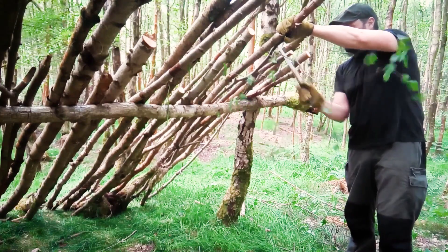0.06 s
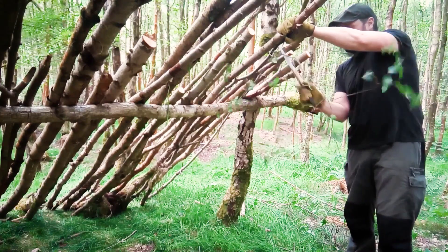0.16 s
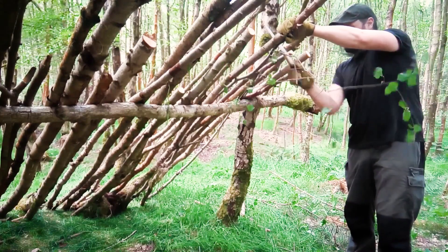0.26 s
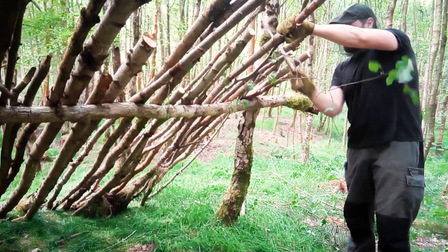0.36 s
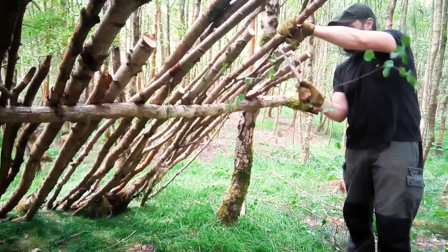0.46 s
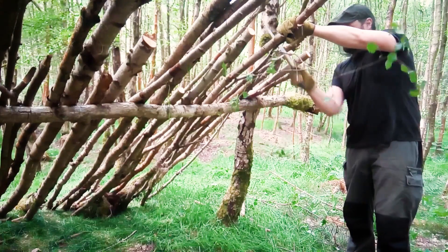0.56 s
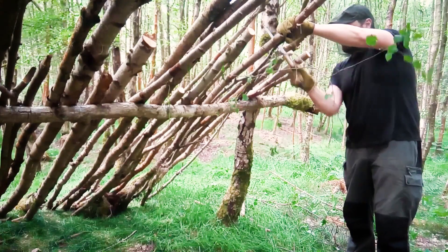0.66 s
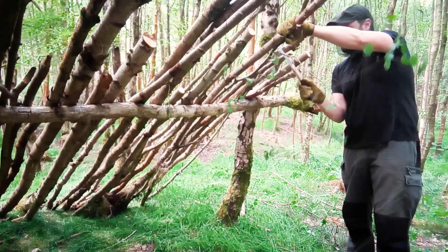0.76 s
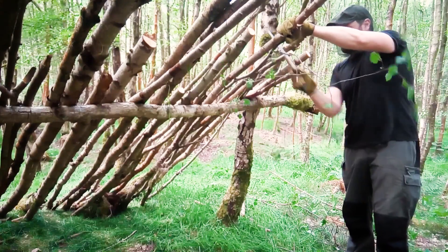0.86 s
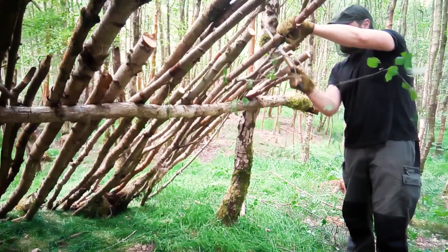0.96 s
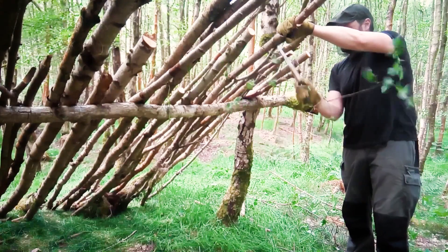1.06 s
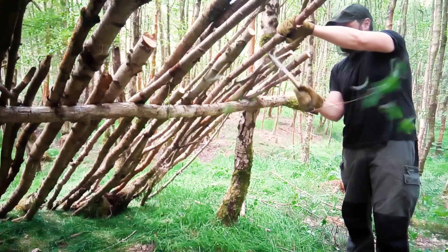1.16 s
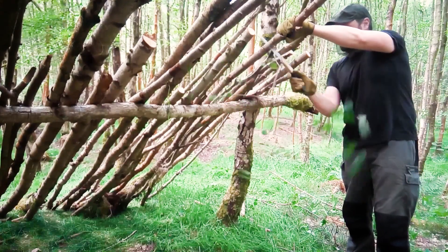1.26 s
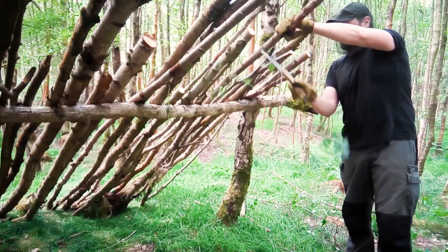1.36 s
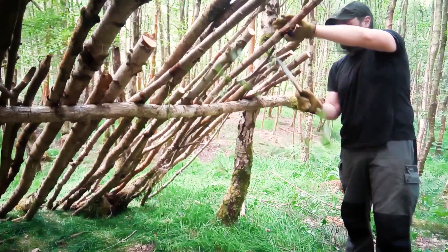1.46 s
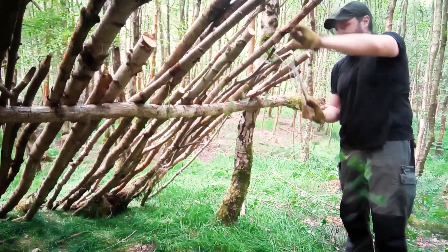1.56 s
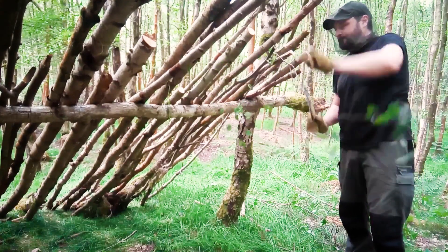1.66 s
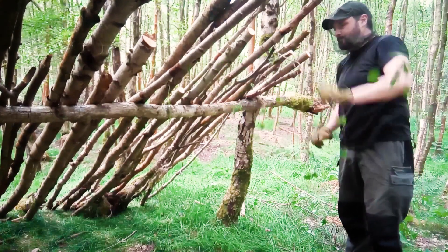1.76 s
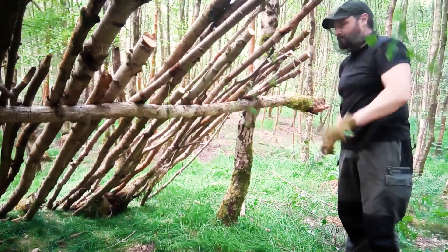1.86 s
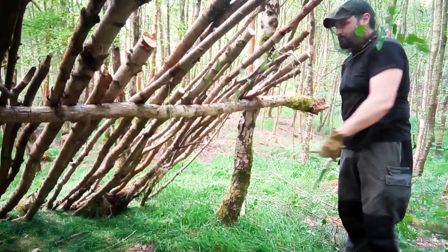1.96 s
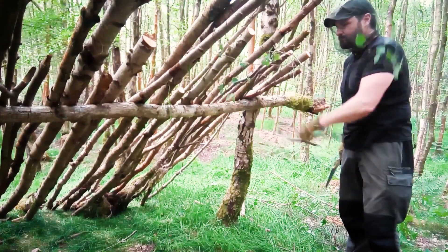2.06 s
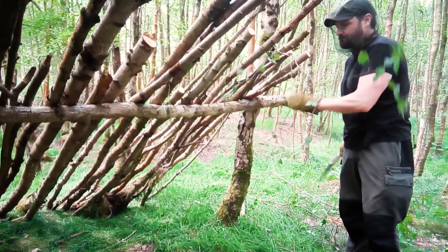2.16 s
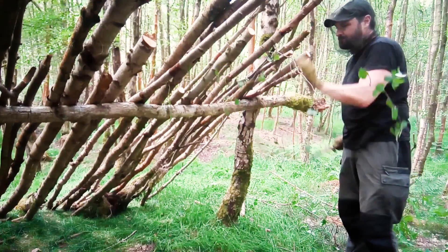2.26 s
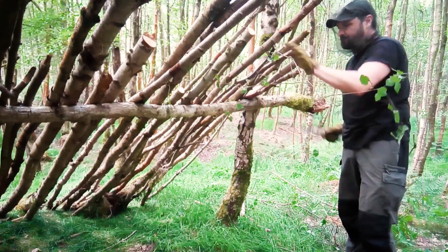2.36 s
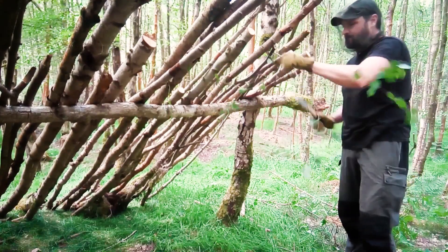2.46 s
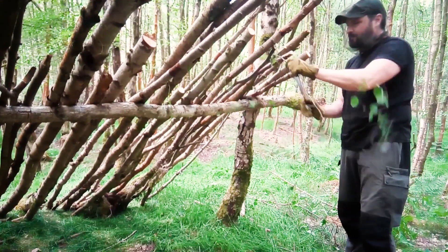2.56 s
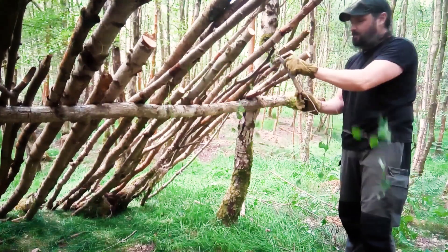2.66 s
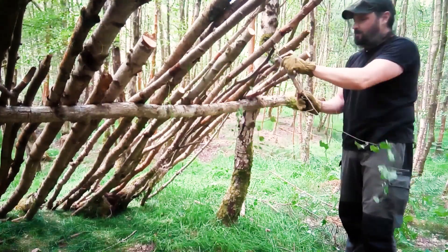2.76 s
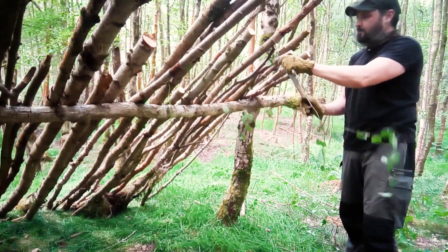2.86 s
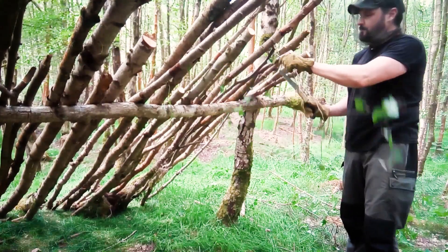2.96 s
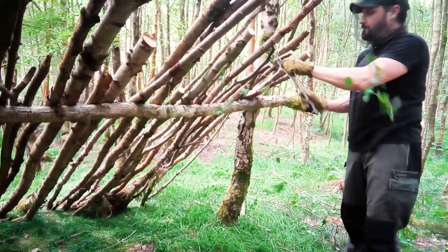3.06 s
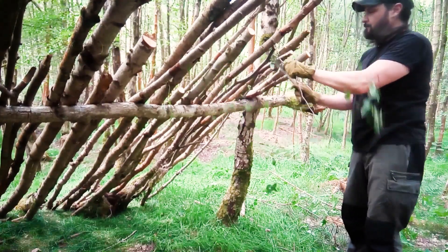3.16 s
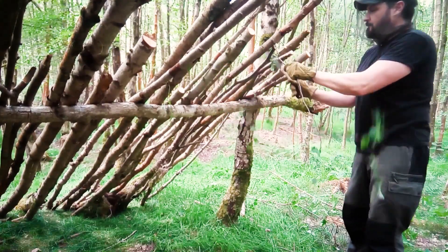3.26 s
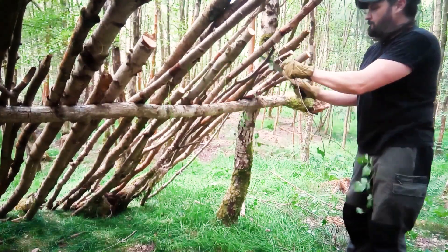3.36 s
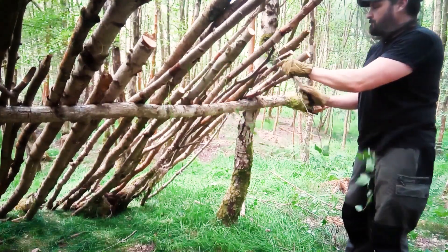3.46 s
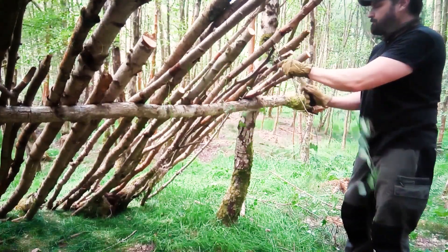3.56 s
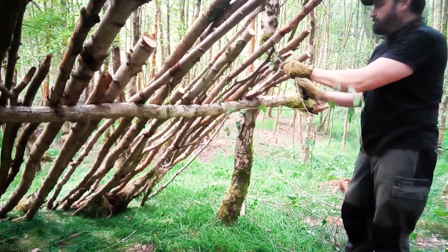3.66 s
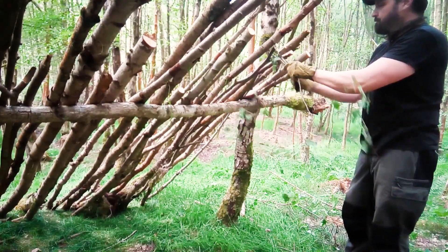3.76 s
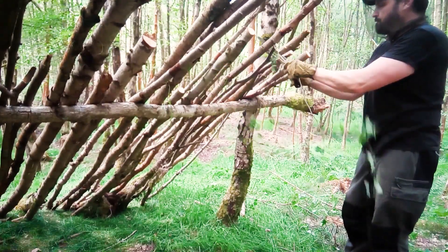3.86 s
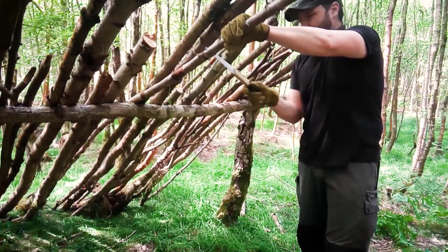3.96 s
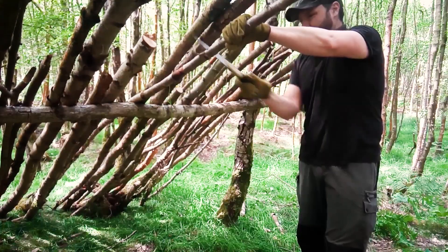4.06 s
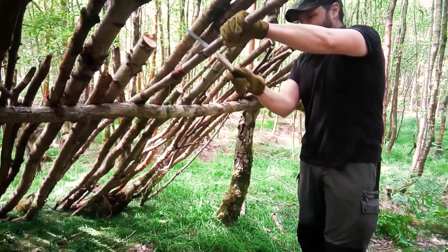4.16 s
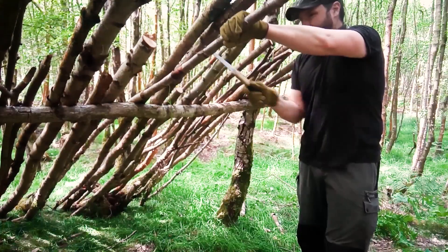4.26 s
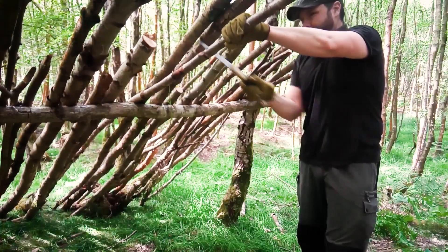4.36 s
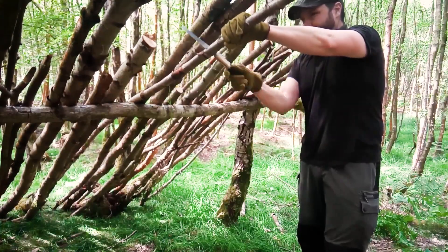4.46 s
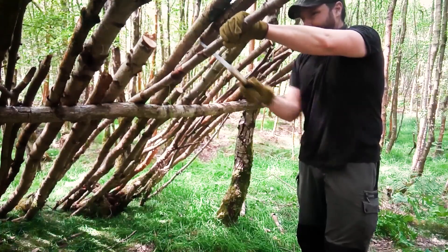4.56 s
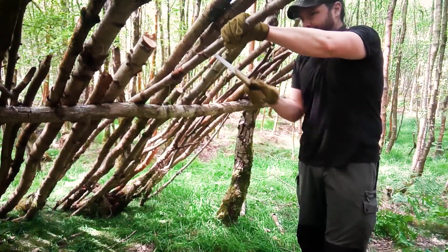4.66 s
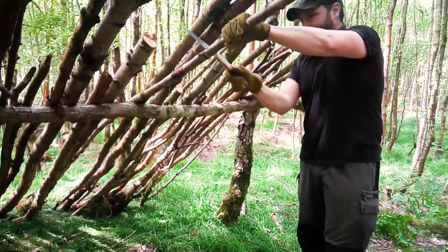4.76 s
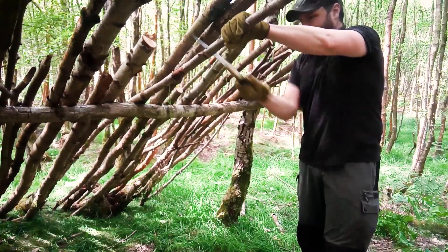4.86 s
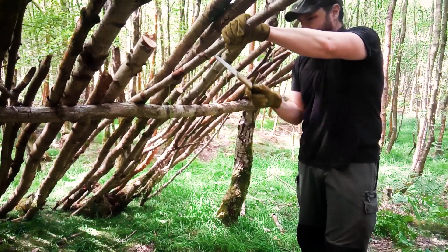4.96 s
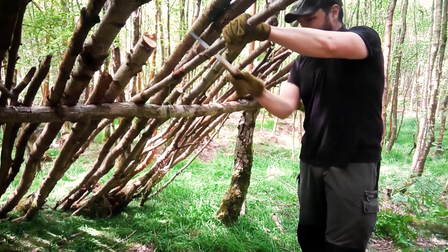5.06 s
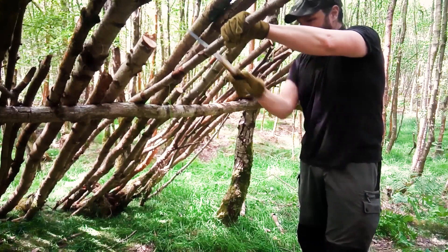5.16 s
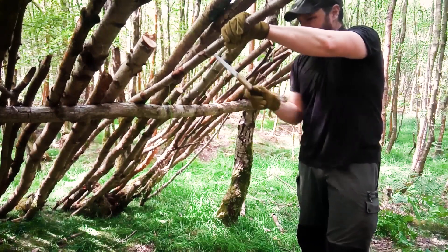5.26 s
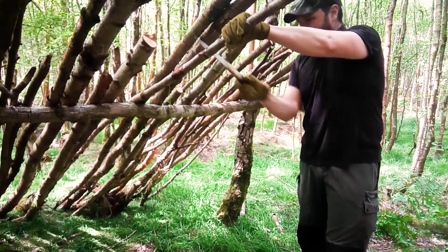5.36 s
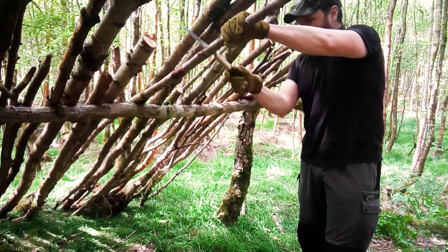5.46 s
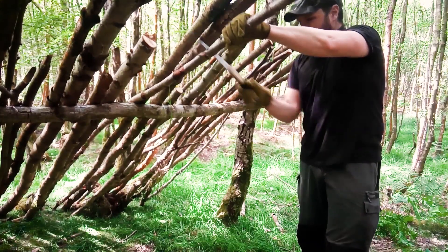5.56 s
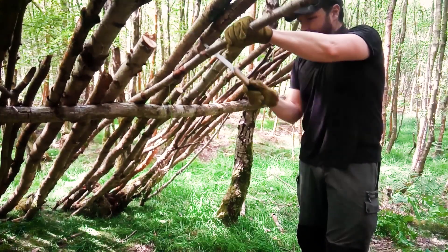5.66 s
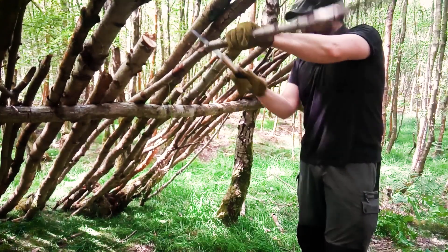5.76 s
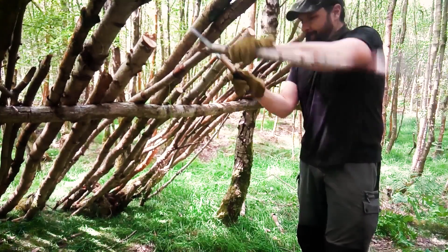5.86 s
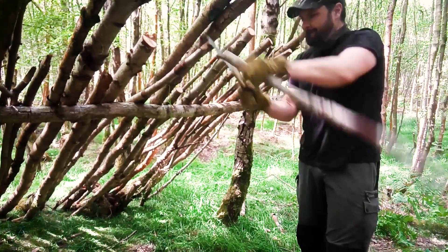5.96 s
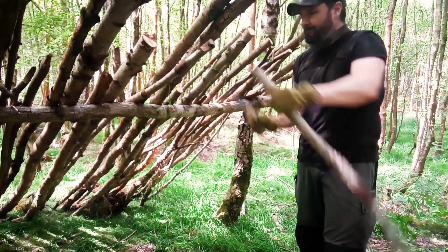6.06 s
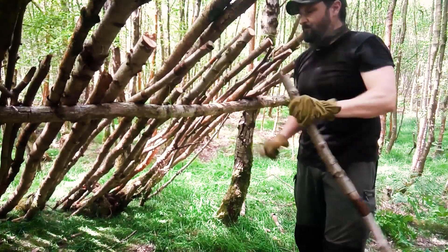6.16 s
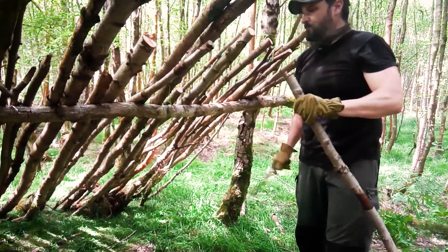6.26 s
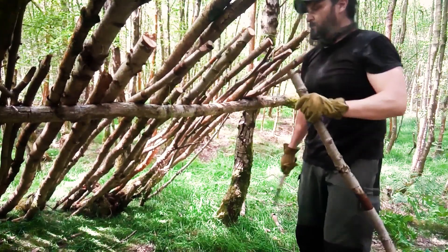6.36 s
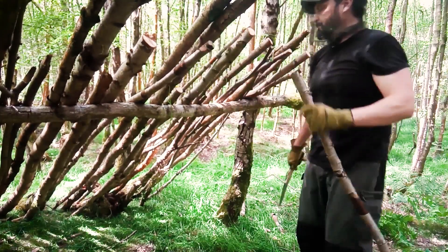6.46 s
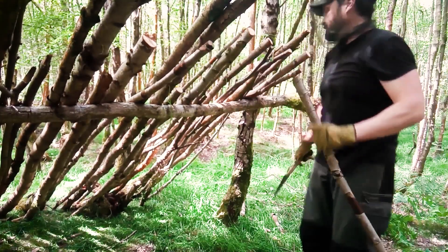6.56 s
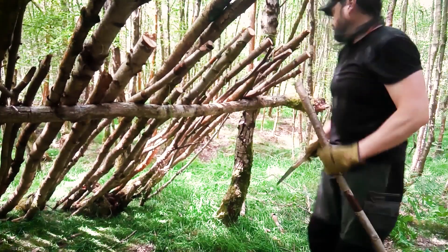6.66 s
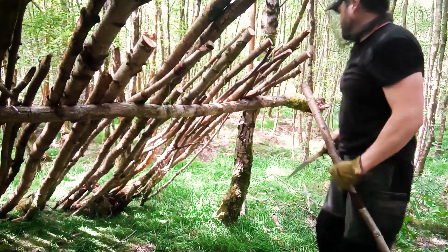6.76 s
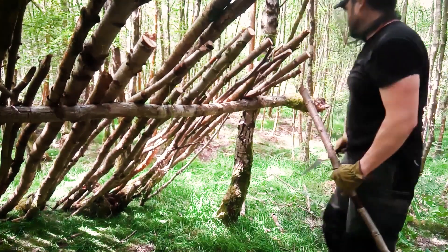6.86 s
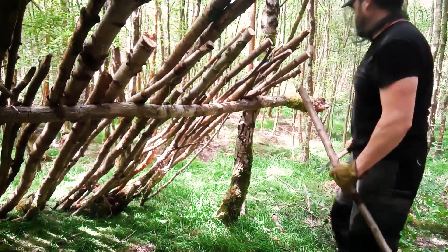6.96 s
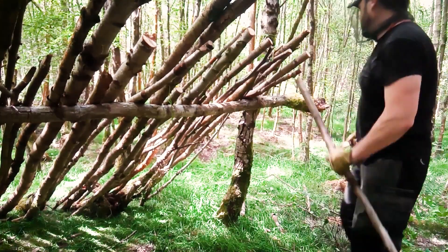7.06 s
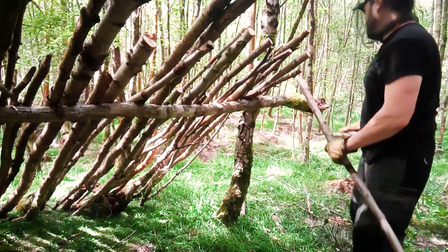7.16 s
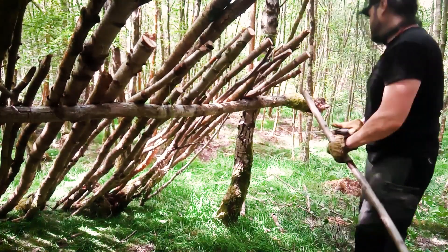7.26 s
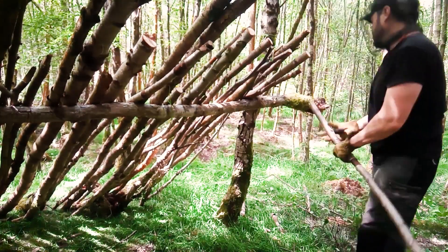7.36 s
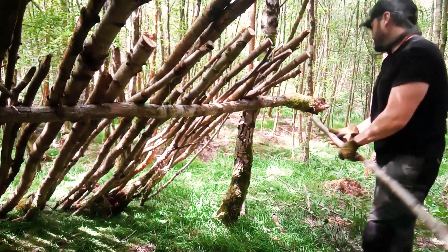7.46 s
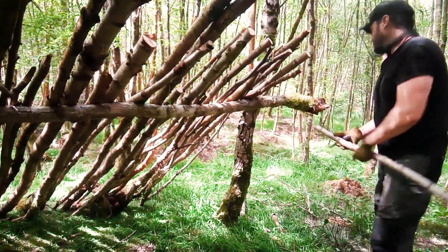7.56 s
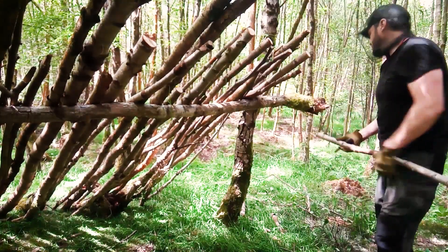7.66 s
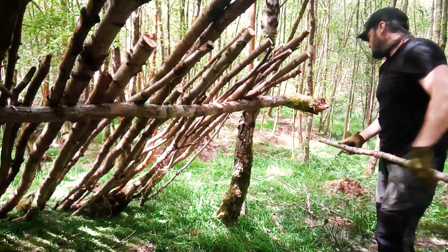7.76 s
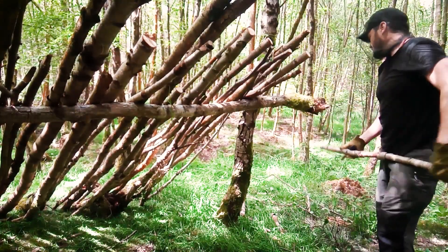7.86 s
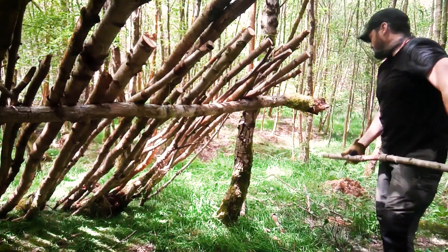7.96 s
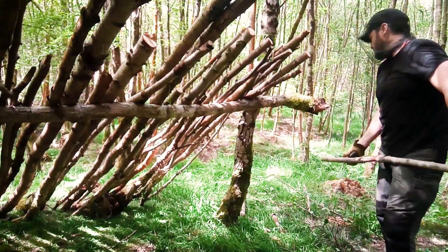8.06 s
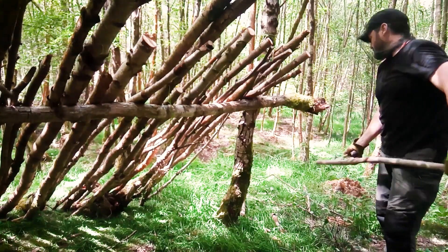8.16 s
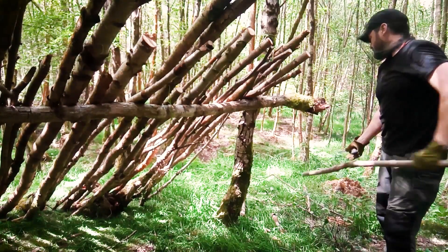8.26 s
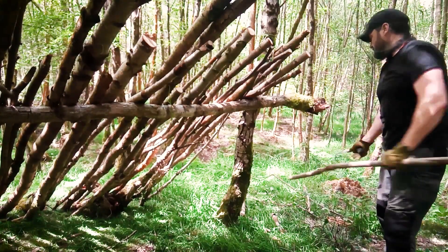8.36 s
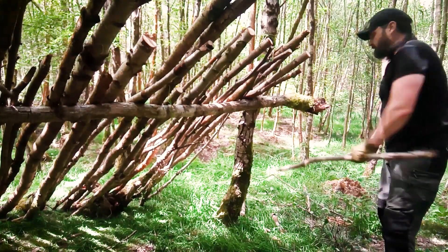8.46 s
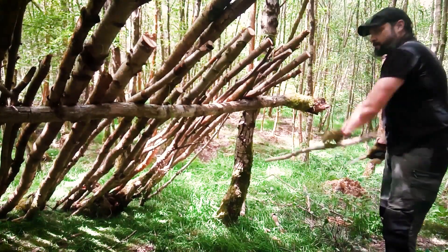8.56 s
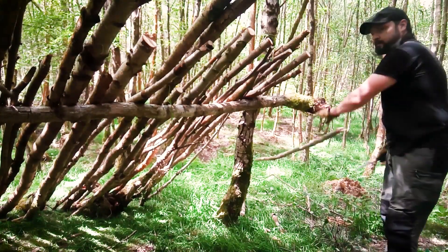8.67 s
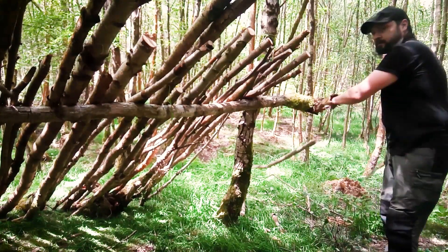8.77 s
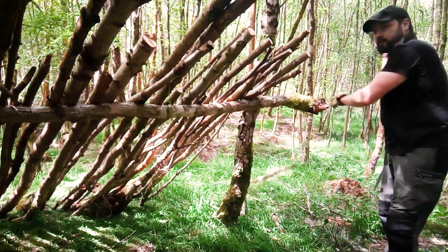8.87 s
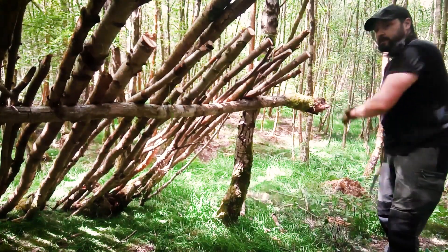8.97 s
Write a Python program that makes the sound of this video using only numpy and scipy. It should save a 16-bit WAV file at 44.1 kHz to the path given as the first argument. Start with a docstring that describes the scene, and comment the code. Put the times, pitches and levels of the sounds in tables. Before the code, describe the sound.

Dry, near sawing over a very soft forest hush with low wind bumps on the microphone. One short run of quick alternating strokes ends in woody cracks; distant birds chirp downward glides in the gap. A second, longer run rings the pole, with scratchy fibres and small metallic snags. Then brittle snaps, a dull thud, crackling litter, light wood knocks and two short bark scrapes, with a slight echo off the trees.

```python
"""Under a quiet wood's hush and wind, a hand saw cuts a thin pole: teeth knock at a rate set by the stroke.
Wood snaps, then bark and litter rustle as crackling grains; far birds whistle gliding tones that mostly echo.
From four seconds the saw cuts again, its knocks ringing the pole, torn fibres rasping and snags ringing the blade.
A dull noise murmur swells, and the cut pole lands with a low, dying thud.
More rustles and snaps follow, with two scrapes of bark as gliding noisy tones and one last faint bird."""
import sys
import numpy as np
from scipy import signal
from scipy.fft import rfft, irfft
from scipy.io import wavfile
from scipy.ndimage import uniform_filter1d

SR = 44100
rng = np.random.default_rng(int(sys.argv[2]) if len(sys.argv) > 2 else 0)


def digitize_waveform(pressure):
    """Quantize a signal to 16-bit integers and store it at the path in sys.argv[1].

    Rows of a 2-D input are taken as channels; values are limited to [-1, 1].
    """
    field = np.atleast_2d(pressure).T
    bounded = np.clip(field, -1, 1)
    quanta = np.round(bounded * 32767).astype(np.int16)
    wavfile.write(sys.argv[1], SR, quanta)


N = 398212
TIME = np.arange(N) / SR   # s

# far hush of the wood, spectrum shape: f/Hz, relative level per Hz/dB
WOODLAND = [(30, -32), (130, -13), (280, -6), (520, -18.5), (1100, -20), (2200, -25), (6000, -27),
            (11000, -46.5), (15800, -41.5)]
WOODLAND_DB = -70.5   # middle level, before its slow drift
# wind on the microphone, middle level before its lumps: t/s, level/dB
WIND = [(0, -66.5), (1.2, -57), (1.4, -75), (2.7, -74), (3.0, -64), (3.3, -71.5), (6.9, -68.5), (8.35, -74),
        (8.55, -66.5)]

# saw strokes, pull and push in turn:
# start t/s, fastest t/s, end t/s, tooth rate at the fastest point f/Hz, knock level/dB, chatter level/dB
STROKES = [(0, .075, .15, 344, -27.5, -43.5), (.18, .258, .315, 360.8, -33.5, -26),
           (.35, .402, .475, 290, -28, -29.5), (.505, .578, .635, 347.8, -33, -30.5),
           (.67, .735, .79, 351.6, -28.5, -34), (.83, .895, .945, 290, -33.5, -27),
           (1.03, 1.095, 1.15, 273, -29, -39), (4.031, 4.108, 4.16, 281.5, -29, -29.5),
           (4.194, 4.255, 4.33, 317, -27, -23.5), (4.358, 4.428, 4.5, 329, -29.5, -23),
           (4.522, 4.598, 4.66, 337, -25.5, -30), (4.681, 4.76, 4.817, 358.7, -28, -36.5),
           (4.853, 4.925, 4.992, 338, -26, -28), (5.032, 5.09, 5.15, 352.9, -27, -51),
           (5.178, 5.252, 5.314, 346.7, -27, -30.5), (5.345, 5.41, 5.488, 359.1, -29.5, -40),
           (5.508, 5.567, 5.66, 274.3, -27.5, -31), (5.677, 5.755, 5.826, 277.1, -34, -40),
           (5.88, 5.945, 5.99, 335.3, -43, -37.5)]
# each cut: start t/s, rasp against knock at the start level/dB, rasp growth as the kerf deepens level/dB per s
CUTS = [(0, -2, 3), (4.001, -3, 4)]
FIRST_CUT = TIME < CUTS[1][0]
# bite of each direction: starting unevenness (0-1), left teeth up and right teeth down by level/dB
PULL, PUSH = (0.11, 0.6), (0.03, 3.1)
ROUGHENING_PER_S = 0.023   # unevenness gained as the kerf deepens
SLOWING = 0.2   # share of the top tooth rate lost from start to end of a stroke
# ringing of the pole: f/Hz, width f/Hz, first pole level/dB, second pole level/dB
POLE = [(290, 860, -2, -2.5), (622, 22, 7.5, 9)]
# colour of the cutting noise: f/Hz, relative level per Hz/dB
RASP = [(90, -41.5), (200, -6.5), (640, -7.5), (1120, -8), (2530, -7.5), (4400, -14.5), (6840, -21),
        (10700, -38.5), (13500, -35), (15800, -23)]
SMEAR = .42   # continuous scraping under the separate tooth knocks
CHATTER_LOW_HZ, CHATTER_TOP_HZ = 400, 1450   # the pole's thump under each steady tooth
CHATTER_POWER = 6.9   # how narrowly the chatter keeps to full speed
# faint singing of the steel blade: f/Hz, level/dB
BLADE = [(2500, -9.5), (4450, -9), (6700, -5.5)]
BLADE_WIDTH = 0.089   # share of the centre frequency

# a tooth snags and lets go, ringing the blade: t/s, peak level/dB
CATCHES = [(0.7557, -12), (4.0327, -13), (4.0554, -17), (4.1574, -12), (4.375, -18), (4.4523, -17),
           (4.4827, -17), (4.8105, -14), (5.0444, -12), (5.1374, -16), (5.1861, -17), (5.3784, -12),
           (5.6226, -12)]
CATCH_T60_S = 0.01

# snaps and knocks of wood: t/s, peak level of the ring/dB, centre f/Hz
SNAPS = [(0.989, -20.5, 2371), (1.002, -12.5, 3080), (1.184, -27, 1340), (1.188, -16.5, 1000),
         (1.2547, -11.5, 985), (1.399, -27.5, 3600), (1.531, -27.5, 2780), (2.397, -30.5, 1114),
         (2.679, -32, 660), (2.826, -36, 1300), (3.255, -37, 1330), (3.268, -32, 1280), (3.305, -41, 1280),
         (3.62, -46.5, 1520), (3.975, -22.5, 2182), (3.987, -36, 4570), (5.651, -21.5, 4486),
         (5.828, -20, 3970), (5.895, -18, 3750), (6.135, -17.5, 2950), (6.163, -22, 2780),
         (6.186, -28, 2880), (6.816, -23.5, 3280), (6.964, -34, 3330), (7.286, -35.5, 3800),
         (7.396, -34, 2220), (7.643, -20.5, 3270), (7.708, -30, 810), (8.113, -30, 2410),
         (8.854, -28.5, 1600), (8.934, -29, 3780)]
SNAP_T60_S, SNAP_RING_CYCLES = 0.053, 23   # ring time: a common part, plus a number of cycles
BRITTLE_HZ = 3000   # snaps below this crack more softly and ring more clearly
SNAP_WIDTH = .3   # ring width of a brittle snap as a share of its centre

# twigs, bark and litter brushed: loudest t/s, rise t/s, fall t/s, crackle level/dB, wooden rub level/dB
RUSTLES = [(1.199, 0.047, 0.043, -63, -26), (1.36, 0.046, 0.074, -47.5, -48),
           (1.517, 0.24, 0.081, -46, -58), (2.57, 0.1, 0.046, -60.5, -65), (2.647, 0.026, 0.092, -47, -49),
           (3.263, 0.023, 0.056, -52, -50.5), (3.788, 0.13, 0.13, -44.5, -48.5),
           (3.991, 0.033, 0.047, -36, -39.5), (5.69, 0.13, 0.024, -31, -41),
           (6.149, 0.028, 0.12, -31.5, -38.5), (6.74, 0.46, 0.23, -39, -45),
           (7.012, 0.045, 0.096, -51.5, -61.5), (7.29, 0.078, 0.065, -53, -67),
           (7.397, 0.0098, 0.21, -52, -57.5), (7.652, 0.16, 0.053, -34.5, -46.5),
           (7.725, 0.032, 0.046, -41.5, -45.5), (7.86, 0.11, 0.1, -49, -47), (8.013, 0.14, 0.078, -41, -49),
           (8.149, 0.077, 0.19, -46.5, -59), (8.557, 0.067, 0.045, -48.5, -60),
           (8.937, 0.11, 0.19, -42, -48)]
# colour of leaf and bark crackle: f/Hz, relative level per Hz/dB
LITTER = [(410, -28), (750, -17), (1160, 0), (3720, 3), (6680, -3), (10100, -26.5), (15800, -13.5)]
RUB_HZ = 900

# bird notes, before flutter and echo: start t/s, end t/s, first f/Hz, last f/Hz, level/dB
BIRDS = [(1.616, 1.715, 4450, 4170, -60), (1.762, 1.86, 3610, 3116, -53), (1.818, 1.927, 3750, 3515, -55),
         (1.93, 2.028, 2740, 2425, -54.5), (1.995, 2.092, 2530, 2215, -59), (2.074, 2.188, 5490, 4630, -63),
         (2.273, 2.363, 5540, 3025, -48.5), (2.402, 2.506, 3790, 3580, -59.5),
         (2.556, 2.739, 3210, 3334, -51), (2.704, 2.837, 2435, 2760, -59.5),
         (2.768, 2.849, 1900, 1744, -62.5), (2.908, 2.985, 4130, 3083, -52.5),
         (2.925, 3.063, 3920, 3860, -61), (2.96, 3.134, 3116, 3047, -63.5), (6.037, 6.156, 5350, 4760, -58),
         (8.569, 8.666, 2980, 2940, -79)]
# dull murmur under the branch handling: loudest t/s, rise t/s, fall t/s, level/dB, low f/Hz, high f/Hz
MURMUR = (7.5, 2.05, 7, -69, 416, 1401)
# the cut pole drops on its butt: level before the dying/dB, f/Hz, time to fall 60 dB t/s
THUD = (-25.5, 235, 0.12)
THUD_S = 6.132
# bark dragged over bark, singing as it slides:
# loudest t/s, rise t/s, fall t/s, first f/Hz, last f/Hz, level/dB
SCRAPES = [(7.725, .02, .035, 800, 520, -43), (8.165, .04, .05, 800, 2500, -45)]
CUTOFF_HZ = 16250   # the steep top of the sound


def from_db(db):
    """Turn dB into gain."""
    return 10 ** (np.asarray(db) / 20)


def rms_one(x):
    """Scale to an average strength (rms) of 1."""
    return x / np.sqrt(np.mean(x ** 2) + 1e-20)


def colour(x, points):
    """Shape the spectrum with a minimum-phase filter, so nothing sounds before its click."""
    hz, db = np.transpose(points)
    grid = np.maximum(np.arange(2049) * SR / 4096, 1)
    log_gain = np.interp(np.log(grid), np.log(hz), db) * np.log(10) / 20
    cepstrum = np.fft.irfft(log_gain)
    # fold the later half onto the earlier one: this makes the filter act forward in time only
    cepstrum[1:2048] *= 2
    cepstrum[2049:] = 0
    return signal.fftconvolve(x, irfft(np.exp(rfft(cepstrum))))[:len(x)]


def resonate(x, hz, width_hz):
    """Ring at one pitch: a two-pole resonance with gain about 1 at its top."""
    r = np.exp(-np.pi * width_hz / SR)
    feedback = [1, -2 * r * np.cos(2 * np.pi * hz / SR), r * r]
    return signal.lfilter([(1 - r * r) / 2, 0, (r * r - 1) / 2], feedback, x)


def filtered(x, order, hz, kind):
    """Butterworth filter of the given kind."""
    return signal.sosfilt(signal.butter(order, hz, kind, fs=SR, output="sos"), x)


def band(x, low_hz, high_hz):
    """Keep the sound between two frequencies."""
    return filtered(x, 2, [low_hz, high_hz], "band")


def drift(rate_hz):
    """Slow random wandering with rms 1, from smoothed noise."""
    r = np.exp(-2 * np.pi * rate_hz / SR)
    noise = rng.standard_normal(N + SR)
    return rms_one(signal.lfilter([1], [1, -2 * r, r * r], noise)[SR:])


def swell(start, top, end):
    """Samples of one movement and its speed, rising from 0 to 1 and back."""
    on = np.flatnonzero((TIME >= start) & (TIME < end))
    return on, np.sin(np.pi / 2 * np.interp(TIME[on], [start, top, end], [0, 1, 2]))


def grains(per_s, spread_db):
    """Random clicks: many small ones and a few much larger."""
    sizes = from_db(spread_db * np.minimum(rng.exponential(1, N), 5)) * rng.choice([-1, 1], N)
    return sizes * (rng.random(N) < per_s / SR)


def ticks(per_s, low_hz, high_hz, count=7):
    """Sparse brittle ticks, each ringing a few cycles at one of several pitches."""
    clicks, dealt = grains(per_s, 2.0), rng.integers(0, count, N)
    out = np.zeros(N)
    for k, hz in enumerate(np.geomspace(low_hz, high_hz, count)):
        out += resonate(clicks * (dealt == k) + 1e-18, hz, 0.18 * hz)
    return out


def patchy(x, low_hz, high_hz, depth_db, rate_hz, count=5):
    """Split into bands that swell and sink each on its own; rms 1."""
    edges = np.geomspace(low_hz, high_hz, count)
    lows = [0] + [filtered(x, 2, hz, "low") for hz in edges] + [x]
    return rms_one(sum(from_db(depth_db * drift(rate_hz)) * (b - a) for a, b in zip(lows, lows[1:])))


def trunks(x, t60, gap_s):
    """Spread-out echo off many trunks: fading noise of energy 1, faded in over the gap."""
    t = np.arange(SR) / SR
    tail = rng.standard_normal(SR) * from_db(-60 * t / t60) * np.clip(t / gap_s, 0, 1)
    return signal.fftconvolve(x, tail / np.sqrt(np.sum(tail ** 2)))[:N]


def air():
    """Far hush of the wood and lumpy wind on the microphone, both coloured noise."""
    hush = from_db(WOODLAND_DB + 1.0 * drift(3)) * rms_one(colour(rng.standard_normal(N), WOODLAND))
    wind_db = np.interp(TIME, *np.transpose(WIND))
    rumble = rms_one(band(rng.standard_normal(N), 68, 180))
    return hush + from_db(wind_db + 6.0 * drift(4.7)) * rumble


def strokes():
    """Each stroke: its samples, its speed, its table row and the bite of its direction."""
    for k, (start, fastest, end, *row) in enumerate(STROKES):
        yield *swell(start, fastest, end), *row, *(PULL, PUSH)[k % 2]


def teeth(flat=.25, wander=.02):
    """One click per tooth, ragged and steady; the rate follows the arm, left and right teeth bite unequally."""
    rate, uneven, set_db = np.full(N, 150.), np.full(N, .3), np.zeros(N)
    depth_s = TIME - np.where(FIRST_CUT, CUTS[0][0], CUTS[1][0])
    for on, speed, top_hz, _, _, rough, db in strokes():
        slowing = 1 + SLOWING * (speed.argmax() - np.arange(len(on))) / len(on)
        rate[on] = top_hz * np.maximum(speed, .05) ** flat * slowing
        uneven[on] = np.clip(rough + ROUGHENING_PER_S * depth_s[on], 0, 1)
        set_db[on] = db
    rate *= 1 + wander * drift(30)
    at = np.flatnonzero(np.diff(np.floor(np.cumsum(rate) / SR)))   # a tooth at each whole count
    time_chance, size_chance = rng.standard_normal((2, len(at)))
    shift = (time_chance * uneven[at] / 2 * SR / rate[at]).astype(int)
    shifted = np.clip(at + shift, 0, N - 1)
    clicks, steady = np.zeros((2, N))
    steady[at] = from_db(set_db[at] * (-1) ** np.arange(len(at)) + 2 * size_chance)
    clicks[shifted] = steady[at] * from_db(10 * uneven[at] * size_chance)
    return clicks, steady


def saw(body_db=7.0, gating=0.23, knock_power=0.37, clear_power=3.0, rasp_power=0.67):
    """Teeth knock and ring the pole, chattering steadily at full speed; torn fibres rasp and ring the blade."""
    pace, knock_gain, rasp_gain, chatter_gain = np.zeros((4, N))
    for on, speed, _, knock_db, chatter_db, *_ in strokes():
        pace[on] = speed
        knock_gain[on] = from_db(knock_db) * speed ** knock_power
        rasp_gain[on] = from_db(knock_db) * speed ** rasp_power
        chatter_gain[on] = from_db(chatter_db) * speed ** CHATTER_POWER
    deepening_db = [db + db_per_s * (TIME - s) for s, db, db_per_s in CUTS]
    rasp_gain *= from_db(np.where(FIRST_CUT, *deepening_db))
    clicks, steady = teeth()

    thumps = band(band(steady, CHATTER_LOW_HZ, CHATTER_TOP_HZ), 200, CHATTER_TOP_HZ)
    pole_hz, pole_width_hz, *pole_db = POLE[1]
    thumps = thumps + from_db(np.where(FIRST_CUT, *pole_db)) * resonate(thumps, pole_hz, pole_width_hz)
    chatter = patchy(thumps, 400, 1300, depth_db=4.5, rate_hz=14)

    # knocks stand out most at full speed
    clear_knocks = pace ** clear_power * rms_one(clicks - clicks.mean())
    drive = colour(clear_knocks + SMEAR * rng.standard_normal(N), RASP)
    modes = np.zeros(N)
    for k, (hz, width_hz, first_db, second_db) in enumerate(POLE):
        gain = from_db(np.where(FIRST_CUT, first_db, second_db))
        modes += (-1) ** k * gain * resonate(drive, hz, width_hz)
    knock = band(band(drive + from_db(body_db) * modes, 140, 2000), 150, 7300)
    knock = patchy(knock, 560, 2700, depth_db=7.0, rate_hz=17)
    # even out the knock's short-time level
    knock = rms_one(knock / (uniform_filter1d(knock ** 2, size=900) + 1e-9) ** .3)

    burst = rms_one(signal.lfilter([1], [1, -.97], clicks))
    # small snags, most where the saw is slow
    snag_clicks = np.abs(grains(110 * (1.3 - pace ** 2), 1.7))
    snags = rms_one(signal.lfilter([1], [1, -.975], snag_clicks))
    tearing = rms_one(grains(6000, 3.17)) + 1.2 * rng.standard_normal(N)
    fibres = tearing * (1 + gating * burst + snags)
    singing = sum(from_db(db + 3.5 * drift(9)) * resonate(fibres, hz, BLADE_WIDTH * hz) for hz, db in BLADE)
    rasp = filtered(colour(fibres + singing, RASP), 2, 1500, "high")
    rasp = patchy(rasp, 3000, 13000, depth_db=-0.5, rate_hz=29.0)
    return chatter_gain * chatter + knock_gain * from_db(drift(31)) * knock + rasp_gain * rasp


def catches():
    """Each snag lets go as a short bright noise burst that rings the blade's tones."""
    out, t = np.zeros(N), np.arange(2000) / SR
    for (s, db), noise in zip(CATCHES, rng.standard_normal((len(CATCHES), len(t)))):
        burst = band(noise * from_db(-60 * t / CATCH_T60_S), 1500, 7300)
        burst = burst + sum(from_db(tone_db) * resonate(burst, hz, BLADE_WIDTH * hz) for hz, tone_db in BLADE)
        start = round(s * SR)
        out[start:start + len(t)] += from_db(db) * burst / np.abs(burst).max()
    return out


def snaps(crack_db=-12, click_size=3.9, body_db=-3, body_ratio=0.6, hold_s=0.0025):
    """Splintering bursts ring a centre and wood modes below and above it; low knocks are dull and ring longer."""
    length = 6000
    out, t = np.zeros(N + length), np.arange(length) / SR
    for (s, db, hz), noise in zip(SNAPS, rng.standard_normal((len(SNAPS), length))):
        noise[0] = click_size * SR / 8 / hz   # the first break
        t60 = SNAP_T60_S + SNAP_RING_CYCLES / hz
        dying = noise * from_db(-60 * np.maximum(t - hold_s, 0) / t60)
        brittle = min(hz / BRITTLE_HZ, 1)
        width = SNAP_WIDTH * hz * brittle ** .5
        ring = resonate(dying, hz, width)
        ring = ring + from_db(body_db) * resonate(dying, body_ratio * hz, width / 2)
        ring = ring + from_db(body_db) * resonate(dying, hz / body_ratio, 2 * width)
        ring = resonate(ring, hz, 2 * hz)
        crack = colour(noise * from_db(-60 * t / 0.011), LITTER)
        hit = ring / np.abs(ring).max() + from_db(crack_db) * brittle ** 2 * crack / np.abs(crack).max()
        start = round(s * SR)
        out[start:start + length] += from_db(db) * hit
    return out[:N]


def rustle(power=2.0, width=0.86):
    """Clumped clicks and ticks make leaf and bark crackle; ringing noise and ticks make a bumpy wooden rub."""
    crackle_gain, rub_gain = np.zeros((2, N))
    for top, rise, fall, crackle_db, rub_db in RUSTLES:
        on, speed = swell(top - rise, top, top + fall)
        crackle_gain[on] += from_db(crackle_db) * speed ** power
        rub_gain[on] += from_db(rub_db) * speed ** power
    hiss = resonate(rng.standard_normal(N), RUB_HZ, width * RUB_HZ)
    hiss = resonate(hiss, RUB_HZ, 2 * width * RUB_HZ)
    rub = rms_one(rms_one(hiss) + 1.2 * rms_one(ticks(300, 440, 1600)))
    clumps = rms_one(grains(2500 * from_db(4.1 * drift(35)), 1.6))
    crackle = clumps + 1.4 * rng.standard_normal(N) + 0.8 * rms_one(ticks(300, 944, 6820))
    crackle = patchy(colour(crackle, LITTER), 830, 5800, depth_db=1.5, rate_hz=20.0)
    return from_db(1.8 * drift(25)) * (crackle_gain * crackle + rub_gain * rub)


def birds(waver=0.007, bend=2.7, flutter_db=4.0):
    """Near-pure whistles that glide in pitch, with a slight waver and a flutter in level."""
    out, wobble = np.zeros(N), 1 + waver * drift(60)
    for start, end, first_hz, last_hz, db in BIRDS:
        on = (TIME >= start) & (TIME < end)
        u = (TIME[on] - start) / (end - start)   # 0 to 1 through the note
        hz = (last_hz + (first_hz - last_hz) * (1 - u) ** bend) * wobble[on]
        out[on] += from_db(db) * np.sin(np.pi * u) ** .5 * np.sin(2 * np.pi * np.cumsum(hz) / SR)
    return out * from_db(flutter_db * drift(58))


def murmur():
    """Dull band of noise with a steep top, swelling slowly."""
    top, rise, fall, db, low_hz, high_hz = MURMUR
    on, speed = swell(top - rise, top, top + fall)
    noise = band(band(rng.standard_normal(len(on)), low_hz, high_hz), low_hz / 2, high_hz)
    out = np.zeros(N)
    out[on] = from_db(db) * speed ** .5 * rms_one(noise)
    return filtered(out, 6, 1.1 * high_hz, "low") * from_db(3.5 * drift(26))


def thud():
    """A low push of tone and noise, dying in the soft ground."""
    db, hz, t60 = THUD
    t = np.maximum(TIME - THUD_S, 0)
    push = rms_one(band(rng.standard_normal(N), 0.27 * hz, 1.6 * hz))
    return from_db(db - 60 * t / t60) * np.minimum(t / 0.01, 1) * (np.sin(2 * np.pi * hz * t) + .5 * push)


def scrapes(width_hz=120):
    """A gliding tone made noisy by random wandering, as loud as the slide is fast."""
    out = np.zeros(N)
    rough = drift(width_hz) + 1j * drift(width_hz)
    for top, rise, fall, first_hz, last_hz, db in SCRAPES:
        on, speed = swell(top - rise, top, top + fall)
        hz = np.geomspace(first_hz, last_hz, len(on))
        tone = np.exp(2j * np.pi * np.cumsum(hz) / SR)
        out[on] += from_db(db) * speed * np.real(rough[on] * tone)
    return out


def scene():
    """Near work with a faint echo; far birds are mostly echo."""
    near = saw() + catches() + snaps() + rustle() + murmur() + thud() + scrapes()
    near_echo = from_db(-13.5) * trunks(near, t60=0.43, gap_s=0.0037)
    song = birds()
    far = from_db(-3.0) * song + from_db(2.0) * trunks(song, t60=0.76, gap_s=0.0031)
    return (near + near_echo + far + air())[None]


def record(dry):
    """Peaks are rounded, the deepest bass falls away, the top is cut steeply."""
    rounded = .6 * np.tanh(dry / .6)
    rounded = filtered(rounded, 2, 45, "high")
    return signal.sosfilt(signal.cheby2(12, 60, CUTOFF_HZ, fs=SR, output="sos"), rounded)


dry = scene()
out = record(dry)
digitize_waveform(out)
```